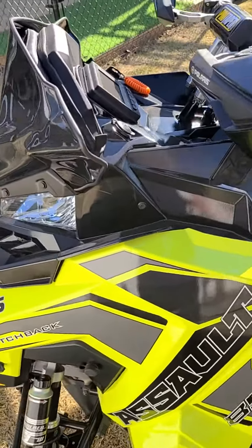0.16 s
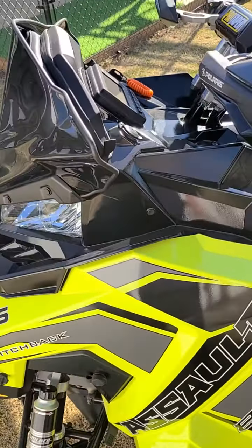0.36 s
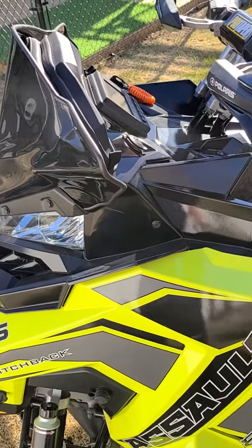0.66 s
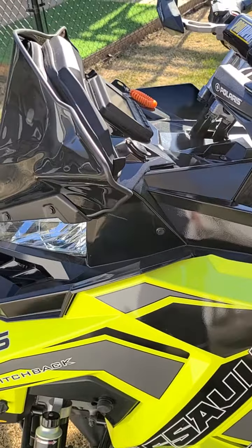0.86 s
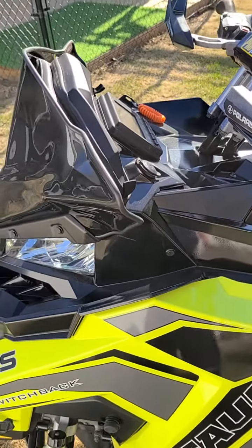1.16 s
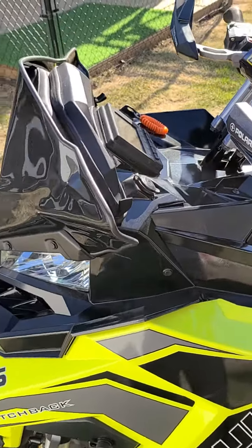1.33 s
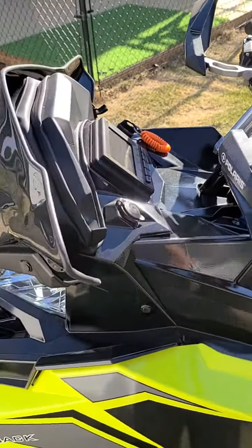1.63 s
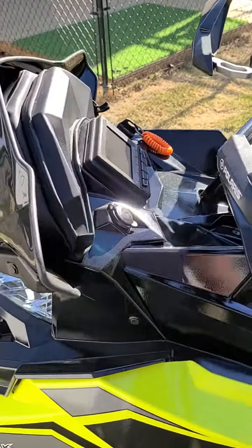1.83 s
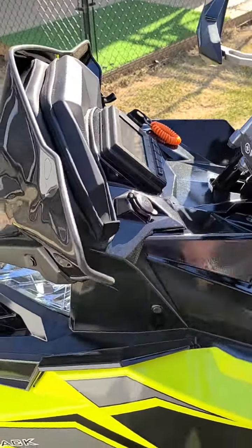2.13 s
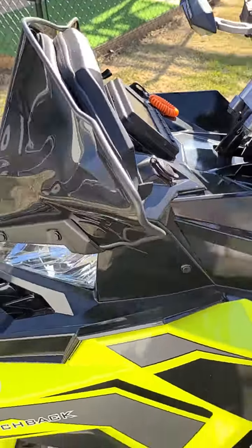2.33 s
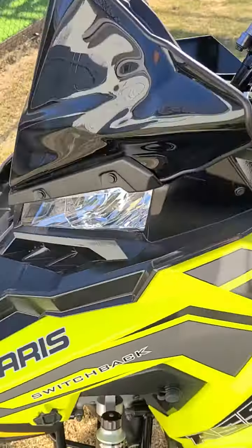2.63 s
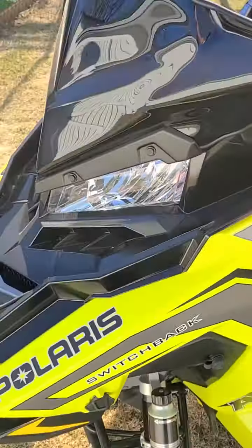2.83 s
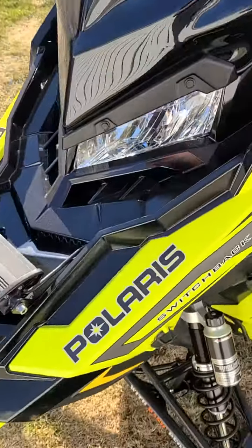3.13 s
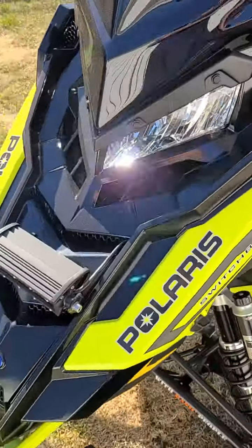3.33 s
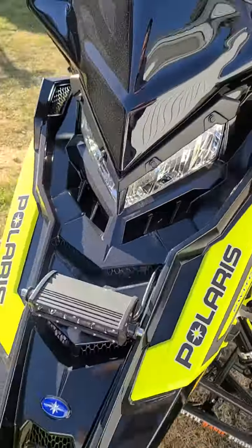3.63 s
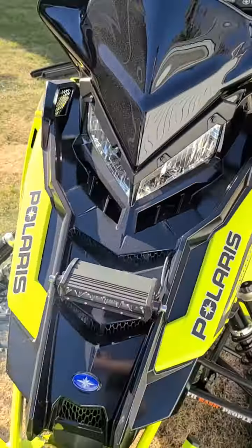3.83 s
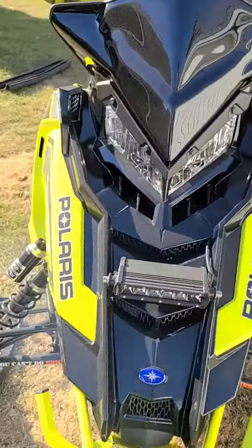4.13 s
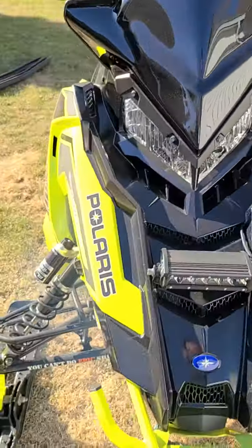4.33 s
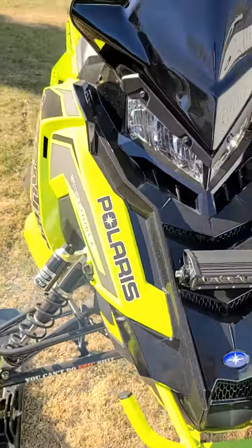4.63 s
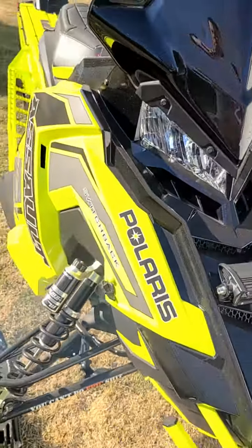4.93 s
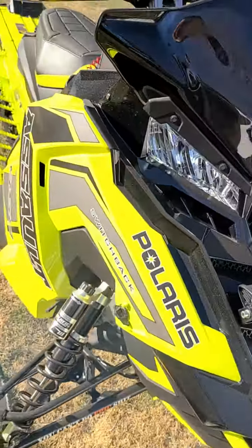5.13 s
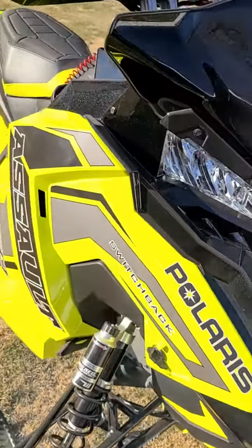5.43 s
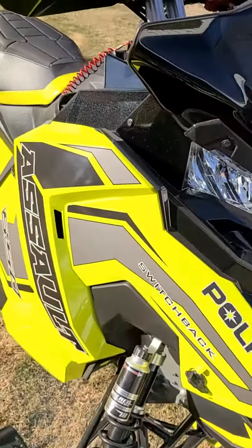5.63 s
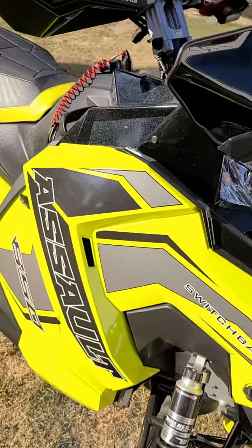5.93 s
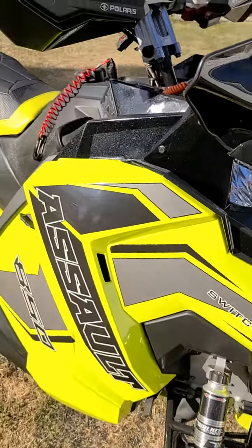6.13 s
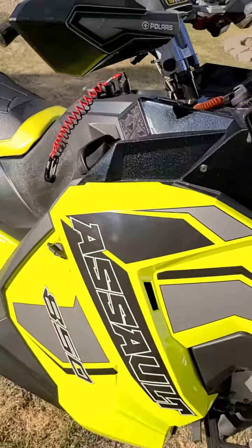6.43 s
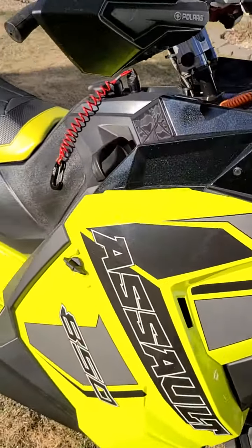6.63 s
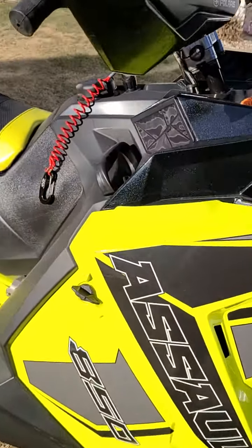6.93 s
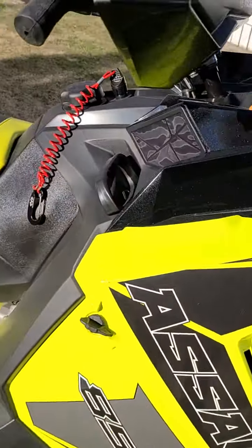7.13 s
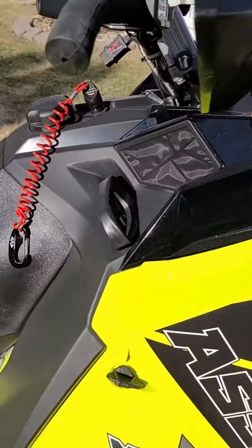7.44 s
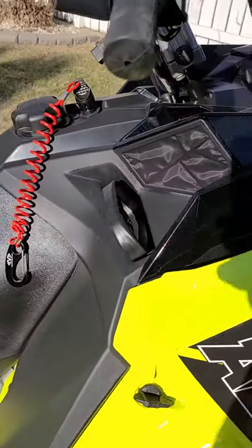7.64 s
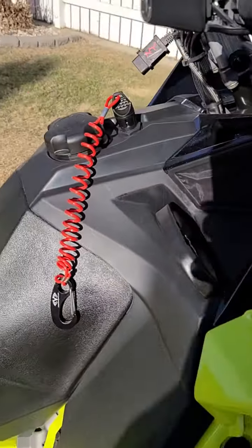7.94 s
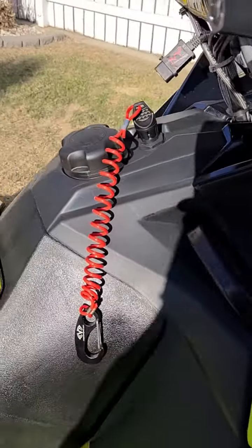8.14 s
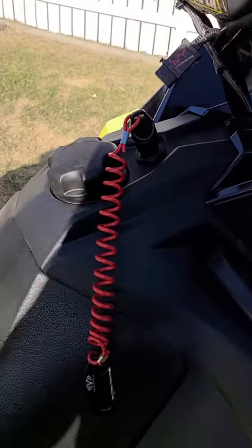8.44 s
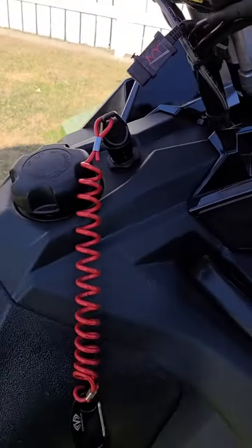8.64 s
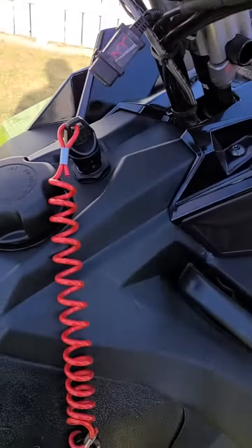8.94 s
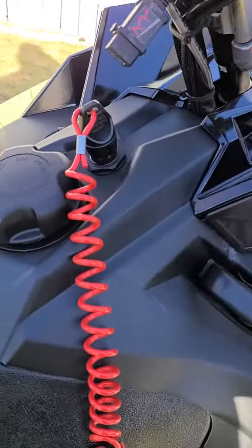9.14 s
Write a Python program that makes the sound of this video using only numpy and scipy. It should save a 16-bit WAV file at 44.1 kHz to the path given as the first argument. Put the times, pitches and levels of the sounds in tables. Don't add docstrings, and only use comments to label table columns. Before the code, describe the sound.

A two-stroke snowmobile engine idles unevenly outdoors, lumpy low pops over a pulsing hum, with piston rattle and gas hiss shifting as the microphone circles.

```python
import sys
import numpy as np
from scipy import signal
from scipy.fft import rfft, irfft, next_fast_len
from scipy.io import wavfile
from scipy.ndimage import uniform_filter1d

SR = 44100
rng = np.random.default_rng(int(sys.argv[2]) if len(sys.argv) > 2 else 0)


def volts_from_db(level):
    exponent = np.asarray(level, float) / 20
    return 10 ** exponent


def output_pcm(signal):
    pcm = np.clip(np.atleast_2d(signal).T, -1, 1) * 32767
    wavfile.write(sys.argv[1], SR, np.round(pcm).astype(np.int16))


N = 408807
TIME = np.arange(N) / SR

# start_s, charge_db, heat (0-1)
FIRINGS = [(0.083, 1, 0.84), (0.1289, 7, 0.9), (0.2033, -2, 0.84), (0.279, 6, 0.82),
           (0.323, -2, 0.84), (0.4302, 5.5, 0.7), (0.446, -1, 0.97), (0.554, 7.5, 0.8),
           (0.569, -22, 0.84), (0.6007, -10, 0.6), (0.6473, 1, 0.65), (0.6949, -3, 0.6),
           (0.727, -7, 0.9), (0.743, 8, 0.9), (0.789, -7, 0.65), (0.866, 8, 0.75),
           (0.8824, -6, 0.9), (0.99, 8, 0.8), (1.0371, 4, 0.98), (1.081, 5, 0.66),
           (1.159, -1, 0.7), (1.2043, 8, 0.87), (1.25, -1, 0.8), (1.3239, 5, 0.7), (1.4016, 2, 1),
           (1.416, -0.0, 0.8), (1.445, 5, 0.67),
           (1.552, -1, 0.75), (1.597, 3, 0.7), (1.6407, 1, 0.81), (1.7454, 6, 0.84),
                   (1.792, 4, 0.86), (1.835, 1, 0.75), (1.9404, -1, 0.94), (1.955, 5.5, 0.74),
                   (2.058, -5, 0.69), (2.0897, -9, 0.57), (2.104, 8.5, 0.79), (2.2085, -4, 0.78),
                   (2.2549, 8, 0.78), (2.2984, 4, 0.88), (2.372, 0.5, 0.76), (2.447, -3, 0.76),
                   (2.4934, 7, 0.7), (2.5381, 2, 0.79), (2.5808, 7.5, 0.93), (2.7156, 5, 1),
                   (2.7307, 9.5, 0.82), (2.8539, 9.5, 0.75), (2.87, -1, 0.92), (2.9476, 1, 0.15),
                   (2.994, 4, 1), (3.0392, 2, 0.92), (3.1163, -7, 0.15), (3.1486, 0, 0.76),
                   (3.1633, 8.5, 0.98),
           (3.288, 8.5, 0.94), (3.335, 0.5, 0.94), (3.3817, 6.5, 0.84), (3.49, 2, 0.8),
              (3.5052, -2, 0.95), (3.536, 6, 0.91), (3.612, -3, 0.53), (3.644, -2, 0.74),
              (3.6595, 5.5, 0.84), (3.7682, 1.5, 0.96), (3.7838, 2.5, 0.89), (3.877, 3.5, 0.9),
              (3.8924, 3, 1), (3.9373, 2.5, 0.6), (4.0159, -0.5, 0.82), (4.0314, -7, 0.57),
              (4.0622, 2.5, 0.8), (4.1076, 3.5, 1), (4.1817, 5.5, 0.84), (4.2574, 1.5, 0.88),
              (4.3001, 5, 0.98), (4.431, 3, 1), (4.446, 4.5, 0.67), (4.564, 4, 0.77), (4.578, -4, 0.98),
           (4.622, 0, 0.69), (4.6994, -1, 0.9), (4.7132, -3, 0.86), (4.743, 3.5, 0.83),
                    (4.8763, -1.5, 0.82), (4.8901, 6.5, 0.85), (5.01, 7, 0.68), (5.026, -12, 0.73),
                    (5.056, -6, 0.71), (5.1003, 6, 0.86), (5.177, -8, 0.66), (5.2529, 6.5, 0.81),
                    (5.3, 1.5, 0.84), (5.3436, -1.5, 0.47), (5.451, 1, 0.6), (5.466, 0.5, 0.87),
                    (5.559, -4, 0.15), (5.6058, 5, 0.78), (5.6507, 1, 0.79), (5.8, 5, 0.77),
                    (5.874, -2, 0.72), (5.9191, 3, 0.78), (5.965, -0.5, 0.82), (6.01, 5, 0.78),
                    (6.1153, -3, 0.72), (6.1601, 8, 0.86),
           (6.2651, 0, 0.61), (6.3079, 5.5, 0.98), (6.4421, -7, 0.56), (6.4563, 2.5, 0.88),
                     (6.535, 1, 0.69), (6.55, 0, 0.87), (6.5775, 1, 0.82), (6.683, 1, 0.78),
                     (6.7281, 7, 0.93), (6.83, -0.5, 0.77), (6.8764, 7, 0.97), (6.9202, 4, 0.92),
                     (7.021, 6, 0.93), (7.0948, 5, 0.84), (7.1392, 7, 0.91), (7.2721, 0, 1), (7.288, -1, 1),
                     (7.317, 1, 0.87), (7.423, -4, 0.48), (7.455, -3, 0.9), (7.4701, 5, 1), (7.575, 4, 0.8),
                     (7.6209, 6, 0.88), (7.6641, -2, 0.78),
           (7.739, 5, 0.8), (7.784, 4.5, 0.96), (7.828, 5, 1), (7.9301, -5, 0.71), (7.977, 5.5, 0.93),
              (8.0215, 1, 0.86), (8.1275, 6, 0.8), (8.1737, 2.5, 0.96), (8.279, -0.5, 0.86),
              (8.323, 3, 0.93), (8.4014, 3, 0.71), (8.48, 2, 0.64), (8.5252, 4.5, 0.99), (8.631, -1, 0.74),
              (8.679, 7, 0.98), (8.783, -3, 0.87), (8.828, 6, 0.99), (8.9029, -4, 0.85), (8.948, 6.5, 0.91),
              (9.025, 1, 0.91), (9.0696, 6.5, 0.96), (9.1744, 1, 0.88), (9.2191, 5.5, 0.98)]
FIRES = FIRINGS
FIRED, CHARGE_DB, HEAT = np.transpose(FIRES)
HEAT = np.clip(HEAT, 0, 1)
HALF_TURN_S = .0151
STEPS = np.round(np.diff(FIRED, prepend=FIRED[0]) / HALF_TURN_S)
CYLINDER = 2 * (np.cumsum(STEPS) % 2) - 1
SEAT_S = 7.43
# shut_hood_db, left_vent_db, nose_vents_db, right_vent_db
BARK_PATHS = (-33.5, -29.5, -49, -42)


def thumps():
    t = np.arange(-1500, 1501) / SR
    packet = -np.cos(2 * np.pi * 111.4 * (t - .0003)) * near(t, .001, 0.0069)
    push = volts_from_db(-22.0) * np.sin(2 * np.pi * 48.6 * t) * near(t, 0, 0.028)
    bark = np.sin(2 * np.pi * 762.0 * t) * near(t, -0.002, 0.0026)

    thump_db = -5.5 + 0.16 * CHARGE_DB - 0.7 * CYLINDER - 1.0 * (STEPS == 1)
    thump = volts_from_db(thump_db + 0.06) * (1 - 0.67 * (1 - HEAT))
    push_size = volts_from_db(thump_db - 6.0 + 7 * rng.standard_normal(len(FIRED)))

    outlet = at_outlet(FIRED)
    at_seat = np.clip((FIRED - SEAT_S) / .5, 0, 1)
    bark_db = heard(BARK_PATHS, FIRED) + 11.5 * outlet + 0.61 * CHARGE_DB
    bark_db = bark_db + 2.7 * (np.diff(FIRED, append=99) < .02) * outlet
    bark_db = bark_db + 2 * rng.standard_normal(len(FIRED)) + 1.0 - 6 * at_seat
    blow = clicks(FIRED - .006, at_seat * HEAT * volts_from_db(-29 + .4 * CHARGE_DB))
    frame = volts_from_db(-20.0) * ring(swell(blow, .0001, 0.0001), 680, 0.12)

    out = frame + signal.fftconvolve(clicks(FIRED, thump), packet, "same")
    out = out + signal.fftconvolve(clicks(FIRED, push_size), push, "same")
    return out + signal.fftconvolve(clicks(FIRED, volts_from_db(bark_db)), bark, "same")


def crank():
    slowing_per_s = 0.566
    at = np.concatenate([[FIRED[0] - .3], FIRED, [FIRED[-1] + 0.338]])
    steps = np.concatenate([[20], STEPS[1:], [20]]) / 2
    start = np.cumsum(steps) - steps - 10
    k = np.searchsorted(at, TIME) - 1
    span = np.diff(at)[k]
    share = (TIME - at[k]) / span
    return start[k] + steps[k] * (share + slowing_per_s * span / 2 * share * (1 - share))


def passing(turns, angle, every):
    return np.interp(np.arange(-4, turns[-1], every) + angle, turns, TIME, left=-1, right=-1)


def regrowth():
    cut = FIRED - .0045
    lasting = np.clip(0.19 + 0.17 * at_outlet(TIME), 0, .9)
    regrown = 1
    for last in np.searchsorted(cut, TIME) + np.array([[0], [1]]):
        since, heat = TIME - np.r_[-2, -1, cut][last], np.r_[0, 0, HEAT][last]
        quick = heat * np.exp(-np.maximum(since - 0.021 * heat, 0) / 0.0077)
        slow = lasting * heat ** 2 * np.exp(-since / 0.062)
        regrown = regrown * (1 - quick) * (1 - slow)
    return uniform_filter1d(regrown, size=120)


# crank_order, level_db
HUM_LINES = [(2, -21.5), (3, -35), (4, -1), (5, -47), (6, -19)]
# shut_hood_db, left_vent_db, nose_vents_db, right_vent_db
EIGHTH_PATHS = (-42, -37.5, -54, -32.5)


def hum(turns, twelfth_db):
    angle = 2 * np.pi * (turns + 0.015)
    lines = 0
    for order, db in HUM_LINES:
        wander_db = 1.54 * (order != 4) * drift(2.5)
        seat_loss_db = (order == 6) * 6.5 * np.clip(TIME - SEAT_S - .4, 0, 1)
        lines = lines - volts_from_db(db + wander_db - seat_loss_db) * np.cos(order * angle)

    tail_db = -32.5 + 5 * np.minimum(TIME - 7.9, 0)
    eighth_db = 10 * np.log10(volts_from_db(heard(EIGHTH_PATHS, TIME)) ** 2 + volts_from_db(tail_db) ** 2)
    eighth = volts_from_db(eighth_db + 2 * at_outlet(TIME) + 5.5 + 1.0 * drift(6.9)) * np.sin(8 * angle - 1.2)
    phase = -1.0 * at_outlet(TIME - .6) + 0.25 * drift(5.7)
    twelfth = volts_from_db(twelfth_db + 3.5 + 2.0 * drift(13.0)) * np.sin(12 * angle + phase)
    level = volts_from_db(-11 + 3.0 + 0.24 * drift(21.0) + 0.8 * drift(2.9))
    return regrowth() * (level * lines + eighth + twelfth)


def silencer(turns, level_db):
    strokes = passing(turns, 0.2095, .5)
    soft = clicks(strokes, volts_from_db(1.3 * rng.standard_normal(len(strokes)))) + volts_from_db(-25.0) * rng.standard_normal(N)
    strike = HEAT * volts_from_db(.3 * CHARGE_DB + 0.95 * rng.standard_normal((2, len(FIRED))))
    struck = clicks(FIRED - .0033 + 0.00056 * at_outlet(FIRED - .6), strike[0])
    can = rms_one(ring(soft, 378.4, 0.099)) + volts_from_db(13.5) * ring(struck, 386.0, 0.096)
    pipe = volts_from_db(-17 + 2.0 * at_outlet(TIME + .5)) * ring(clicks(FIRED - .0036, strike[1]), 262.8, 0.063)
    return signal.lfilter([.05], [1, -.95], volts_from_db(level_db - .5) * can + pipe)


def blip(hz, peak_s, phase, rise=2):
    t = np.arange(900) / SR
    return np.sin(2 * np.pi * hz * t + phase) * (t / peak_s) ** rise * np.exp(-t / peak_s)


# shut_hood_db, left_vent_db, nose_vents_db, right_vent_db
LOW_KNOCK_PATHS = (-65, -24, -60, -60)
HIGH_KNOCK_PATHS = (-69, -29, -70, -27)


def knocks(turns, high_hz, pan_db):
    low_db, high_db = heard(LOW_KNOCK_PATHS, TIME), heard(HIGH_KNOCK_PATHS, TIME)
    out = np.zeros((2, N + 900))
    slaps = passing(turns, 0.1577, .5)
    chance = rng.standard_normal((len(slaps), 8))
    for k, (s, c) in enumerate(zip(slaps, chance)):
        if s < 0:
            continue
        i = int(s * SR)
        weak_db = -(13.3 + 9.1 * at_outlet(s + 0.56)) * (k % 2) + 0.5 * c[7]
        side = np.array([[0.094 * c[4] - .5], [-.2 * c[4] + .5]])

        low_hz = (745.0 + 30.0 * near(s, 3.1, .3)) * (1 + 0.013 * c[0])
        low = volts_from_db(low_db[i] + 10.0 + 0.81 * c[2]) * blip(low_hz, 0.0015, 0.36 * side + 0.25 * c[5])

        high = volts_from_db(high_db[i] + 14.0 + 0.56 * c[3]) * blip(high_hz[i] * (1 + 0.014 * c[1]), 0.0013, side, 1.26)
        after = blip(.96 * high_hz[i] * (1 + 0.071 * c[0]), .0018, side + 3 * c[2])
        high = high + at_outlet(s + 0.4) * volts_from_db(high_db[i] + 5.1 * c[6]) * after

        top_db = high_db[i] - 4.5 + 3.2 * at_outlet(s + .7) + 3.3 * c[6] - 6.0 * near(s, 3.15, .2)
        top = volts_from_db(top_db) * blip(2060.0 * (1 + 0.015 * c[7]), 0.0026, 1.0 * side, 1.6)
        right_hz = (2180.0 + 140.0 * np.clip((s - 5.1) / .6, 0, 1)) * (1 + 0.014 * c[3])
        top = top + at_outlet(s + .6) * volts_from_db(high_db[i] - 4.0 + 2.0 * c[1]) * blip(right_hz, 0.0028, side, 1.4)

        right = blip(674 * (1 + 0.037 * c[0]), 0.0041, .4 * side + 3 * c[5])
        out[:, i:i + 900] += volts_from_db(weak_db) * lean(pan_db[i]) * (low + high + top)
        out[:, i:i + 900] += at_outlet(s + 0.38) * volts_from_db(-31.5 + 2.3 * c[2]) * right
    return out[:, :N]


# start_s (middle), width_s, pitch_hz, level_db
GAPS = [(1.0, 1.2, 1260, -48), (2.1, .5, 2300, -57), (3.4, .15, 1780, -48), (4.1, 0.44, 1750, -51),
        (4.1, .3, 560, -44), (4.4, .4, 1180, -48), (4.75, 0.14, 1400, -50), (4.75, .45, 810, -41),
        (6.3, .4, 520, -43), (6.4, .5, 1200, -49)]


def vents_and_gaps(howl_db):
    air = rng.standard_normal((2, N))
    howl = volts_from_db(howl_db) * rms_one(ring(ring(air, 1280.0, 0.01), 1280.0, 0.01))
    for s, width, hz, db in GAPS:
        howl = howl + volts_from_db(db) * near(TIME, s, width) * rms_one(ring(ring(air, hz, .025), hz, .025))
    return howl


# pitch_hz, level_db (per Hz)
RUMBLE_COLOUR = [(100, -32), (170, -16), (250, -11.5), (330, -25), (400, -12), (500, -19.5), (680, -17),
                 (850, -22), (1100, -53), (1430, -49)]
CLATTER_COLOUR = [(590, -18), (1000, -1.5), (1510, -2.5), (2690, -19), (3240, -18), (3840, -23),
                  (4500, -22), (5850, -26.5), (9900, -120)]
# shut_hood_db, left_vent_db, nose_vents_db, right_vent_db
RUMBLE_PATHS = (-36.5, -41, -41.5, -38)
CLATTER_PATHS = (-40, -45.5, -45, -55)


def casing(turns):
    throb = volts_from_db(0.67 * np.cos(4 * np.pi * (turns - .22)) + 1.47 * np.cos(2 * np.pi * (turns - .25)))
    jump = swell(clicks(FIRED - .007, volts_from_db(-0.5 + 0.53 * (CHARGE_DB - 6.0))), 0.0023, 0.0052)

    rumble_db = heard(RUMBLE_PATHS, TIME) + 4.5 - 2.0 * at_outlet(TIME) - 2.5 * near(TIME, 4.7, .35)
    rumble = volts_from_db(rumble_db + 0.57 * drift(22.0)) * stereo_noise(RUMBLE_COLOUR)

    clatter_db = heard(CLATTER_PATHS, TIME)
    broad_db = np.minimum(clatter_db, -39.5)
    clatter = volts_from_db(broad_db + 4.0 - 2.0 * near(TIME, 3.05, 0.23) + 1.04 * drift(32.0))
    clatter = clatter * stereo_noise(CLATTER_COLOUR)
    hollow = .45 * (near(TIME, 3.9, .6) + .5 * at_outlet(TIME))
    clatter = clatter - hollow * bandpass(clatter, 2700.0, 5200.0)

    facing_db = -4 * (1 - near(TIME, 4.66, 0.99)) - 11.0 * near(TIME, 3.0, 0.38)
    excess = np.sqrt(volts_from_db(clatter_db) ** 2 - volts_from_db(broad_db) ** 2)
    howl_db = 20 * np.log10(excess + 1e-20) + 14.5 + facing_db
    return (throb + jump) * (rumble + clatter + vents_and_gaps(howl_db))


# pitch_hz, level_db (per Hz)
HISS_COLOUR = [(2350, -39), (4000, -10.5), (5210, -8), (6020, -0.5), (8120, -3.5), (9770, -4.5), (11500, 0),
               (12600, 1.5), (13100, -6), (13700, -2.5), (15950, -5.5), (16600, -90)]
# shut_hood_db, left_vent_db, nose_vents_db, right_vent_db
HISS_PATHS = (-56, -72, -45, -70)
WHISTLE_PATHS = (-23, -1.5, -4.5, -50)


def hiss(turns):
    floor_db = heard(HISS_PATHS, TIME)
    steady = volts_from_db(floor_db + 4.5 + 0.37 * np.cos(2 * np.pi * (turns + 0.33)) + 0.75 * drift(31.0))
    blast = volts_from_db(heard(HISS_PATHS, FIRED) + 14.5 + CHARGE_DB)
    above = np.maximum(blast - steady[(FIRED * SR).astype(int)], 0)
    burst = swell(clicks(FIRED - .009, above), 0.0045, 0.0054)

    white = rng.standard_normal((3, 2, N))
    whistle = volts_from_db(heard(WHISTLE_PATHS, TIME) + 3.1 * drift(14.0)) * rms_one(ring(white[0], 13310.0, .016))
    facing = np.clip((floor_db + 50.5) / 5.2, 0, .9)
    resonant = lean(5.0) * rms_one(ring(white[1], 5960.0, 0.0053))
    resonant = rms_one(resonant + 1.86 * rms_one(ring(white[2], 11730.0, 0.0049)))

    broad = stereo_noise(HISS_COLOUR)
    shaded = bandpass(broad, 8200.0, 11000.0) + 1.5 * bandpass(broad, 12100.0, 13000.0)
    broad = broad - 0.17 * np.clip((3.3 - TIME) / .4, 0, 1) * shaded
    openness = .15 + .4 * near(TIME, 3.5, .8) - .7 * np.clip((TIME - 4.3) / 3.0, 0, 1)
    broad = broad + openness * bandpass(broad, 14300.0, 17500.0)
    return (steady + burst) * (np.sqrt(1 - facing / 2) * broad + np.sqrt(facing / 2) * resonant + whistle)


# shut_hood_db, left_vent_db, nose_vents_db, right_vent_db
BELT_PATHS = (-57, -46.5, -70, -70)


def belt_whir(turns):
    hidden_db = 7.7 * np.clip((TIME - 3.0) / 0.22, 0, 1)
    pulse_db = 5.1 * np.cos(4 * np.pi * (turns - .2))
    return volts_from_db(heard(BELT_PATHS, TIME) - hidden_db + pulse_db + 3.0 * drift(17.0)) * band(1970.0, 3000.0)


# start_s, level_db
PANEL_JOLTS = [
    (4.868, -18.5),
    (4.885, -27),
]


def panel_slap():
    s, db = np.transpose(PANEL_JOLTS)
    return swell(clicks(s, volts_from_db(db)), 0.0024, 0.0067) * band(780.0, 1380.0)


def traffic():
    return volts_from_db(-41.5 + 1.5 * drift(1.4) - 2.0 + 5.0 * at_outlet(TIME - .3)) * band(17.0, 55.0)[0]


def breeze():
    return volts_from_db(-44 + 1.5 * drift(3.0)) * band(22.0, 56.0)


# start_s, left_vent_db, nose_vents_db, right_vent_db, hood pitch_hz
WALK_ROUND = [(0.0, -6, -16, -32, 1460), (0.9, -5, -14.5, -30, 1424), (2.35, -5, -12.5, -35, 1390),
              (2.7, -1.5, -24, -7, 1440), (3.0, 1.5, -16, 0.5, 1520), (3.3, -2.5, -5, -22, 1430),
              (3.71, -9.5, -2.5, -11, 1510), (4.17, -24, -0.7, -8, 1230), (4.64, -6.5, -2.5, -7, 1550),
              (5.1, -8.5, -5, 0, 1510), (5.56, -11, -3.5, 1.5, 1615), (6.03, -16, -5.5, -0.4, 1620),
              (6.49, -20, -6, -1, 1580), (6.951, -9, -9, -10, 1675), (7.42, -23, -8.5, -3.5, 1605),
              (7.88, -19, -9.5, -11, 1675), (8.34, -38, -7.5, -45, 1520), (9.27, -27, -7, -31, 1510)]


def heard(paths, seconds):
    s, *facing_db = np.transpose(WALK_ROUND)[:4]
    steps = np.arange(0, 10, .01)
    power = volts_from_db(paths[0]) ** 2
    for db, facing in zip(paths[1:], facing_db):
        power = power + volts_from_db(db + np.interp(steps, s, facing)) ** 2
    return np.interp(seconds, steps, 10 * np.log10(power))


def near(x, centre, width):
    return np.exp(-((x - centre) / width) ** 2)


def at_outlet(seconds):
    return near(seconds, 6.55, 1.85)


def lean(db):
    return volts_from_db(db * np.array([[.5], [-.5]]))


def rms_one(x):
    return x / np.sqrt(np.mean(x ** 2) + 1e-20)


def at_hz(points, hz):
    table_hz, value = np.transpose(points)
    return np.interp(np.log(hz + 1), np.log(table_hz + 1), value)


def drift(rate_hz):
    r = np.exp(-80 * np.pi * rate_hz / SR)
    slow = signal.lfilter([1], [1, -2 * r, r * r], rng.standard_normal(N // 40 + 2002))[2000:]
    return np.interp(np.arange(N) / 40, np.arange(len(slow)), rms_one(slow))


def clicks(seconds, sizes):
    at = np.round(seconds * SR).astype(int)
    inside = (at >= 0) & (at < N)
    return np.bincount(at[inside], (sizes + 0 * seconds)[inside], N) + 1e-18


def ring(x, hz, t60):
    r, w = volts_from_db(-60 / (t60 * SR)), 2 * np.pi * hz / SR
    return signal.lfilter([0, np.sin(w)], [1, -2 * r * np.cos(w), r * r], x)


def swell(x, rise_s, fall_s):
    t = np.arange(round(8 * (rise_s + fall_s) * SR)) / SR
    shape = (1 - np.exp(-t / rise_s)) ** 2 * np.exp(-t / fall_s)
    return signal.fftconvolve(x, shape / shape.max())[:N]


def bandpass(x, low_hz, high_hz, order=1):
    return signal.sosfilt(signal.butter(order, [low_hz, high_hz], "band", fs=SR, output="sos"), x)


def band(low_hz, high_hz):
    return rms_one(bandpass(rng.standard_normal((2, N)), low_hz, high_hz, 2))


# pitch_hz, likeness (-1 to 1)
CHANNEL_LIKENESS = [(60, 0.62), (180, 1), (550, 0.32), (1000, 0.25), (1650, -0.22), (4970, -0.041),
                    (15000, 0.026)]
# pitch_hz, left-right level_db
CHANNEL_LEAN = [(2000, 0.5), (2900, 2), (4200, -2.5), (6400, 5), (8000, 1.5), (9800, -5.5), (12000, -2),
                (15000, 1)]


def stereo_noise(spectrum):
    size = next_fast_len(N)
    hz = np.arange(size // 2 + 1) * SR / size
    alike = np.clip(at_hz(CHANNEL_LIKENESS, hz), -.99, .99)
    mid, side = rfft(rng.standard_normal((2, size))) * volts_from_db(at_hz(spectrum, hz))
    pair = np.sqrt(1 + alike) * mid + np.sqrt(1 - alike) * side * np.array([[1], [-1]])
    pair = pair * lean(at_hz(CHANNEL_LEAN, hz) * (hz > 1500))
    return rms_one(irfft(pair, size)[:, :N])


# start_s, can level_db, twelfth order level_db, hiss left-right_db, knock left-right_db
BEARINGS = [(0.0, -23, -38, 2, -3), (0.65, -25, -29.5, 2, -1), (1.4, -23.5, -36, 2.5, -3),
            (1.95, -26.5, -36, 2.5, -3), (2.4, -24.5, -35, 3, 0), (2.84, -22.5, -25.5, 6, -8),
            (3.25, -23.5, -25.5, 2, -12.5), (3.6, -26, -30, -2, -6), (4.1, -27, -29, 0, -7),
            (4.41, -30, -56, -0.5, -2), (5.08, -29, -48, 0.5, 6.5), (5.65, -22.5, -49, 0, -6.5),
            (6.3, -26, -50, 0.5, -6), (6.82, -26.5, -41, 0.5, -3), (7.3, -28, -37, 2, 1),
            (7.75, -26.5, -31, 1, 4), (8.5, -24, -31, 0.5, 0), (9.27, -25, -30.5, 2, 0)]


def scene():
    s, *_, hood_hz = np.transpose(WALK_ROUND)
    bearing_s, *bearings = np.transpose(BEARINGS)
    can_db, twelfth_db, hiss_pan_db, knock_pan_db = (np.interp(TIME, bearing_s, c) for c in bearings)
    turns = crank()

    bass = thumps() + hum(turns, twelfth_db)
    bass = np.array([np.roll(bass, shift=9), bass]) * lean(-.9)
    can = silencer(turns, can_db)
    can = np.array([np.roll(can, shift=4), can]) * volts_from_db(np.array([[-1.9], [1.6]]))

    rest = knocks(turns, np.interp(TIME, s, hood_hz), knock_pan_db)
    rest = rest + casing(turns) + hiss(turns) * lean(hiss_pan_db)
    rest = rest * lean(2.2 - 0.36 * TIME)
    return bass + can + rest + belt_whir(turns) + panel_slap() + traffic() + breeze()


def low_pass(x):
    return signal.sosfilt(signal.butter(12, 15990, fs=SR, output="sos"), x)


def record(dry):
    rounded = signal.lfilter([1, -1], [1, -.9985], 1.499 * np.tanh(dry / 1.325))
    mix = signal.sosfilt(signal.ellip(12, .3, 80, 15750, fs=SR, output="sos"), rounded)
    return low_pass(mix)


dry = scene()
out = record(dry)
output_pcm(out)
```